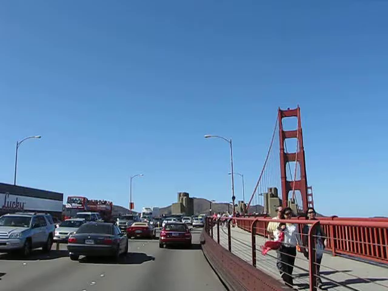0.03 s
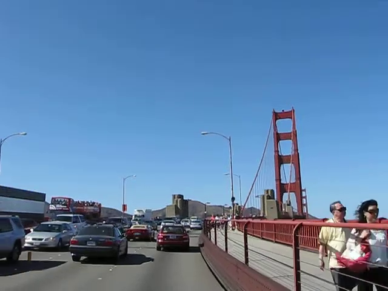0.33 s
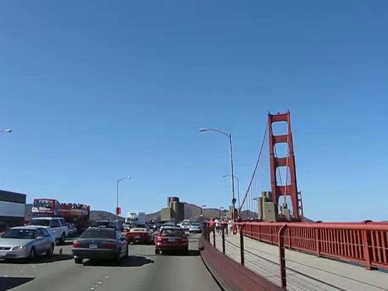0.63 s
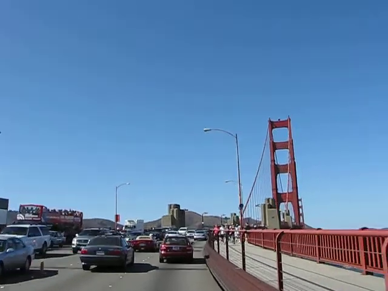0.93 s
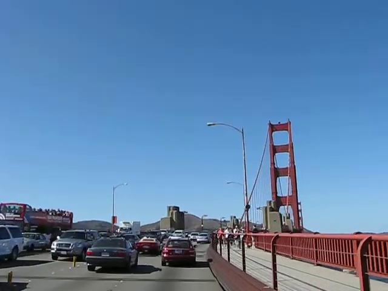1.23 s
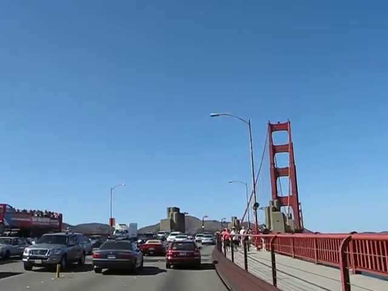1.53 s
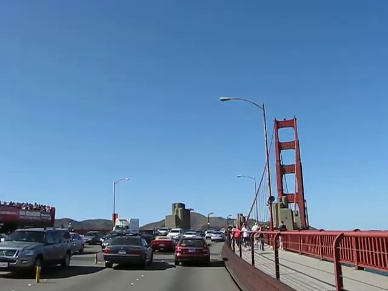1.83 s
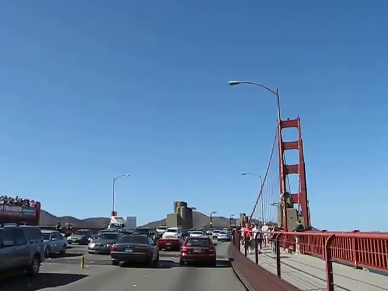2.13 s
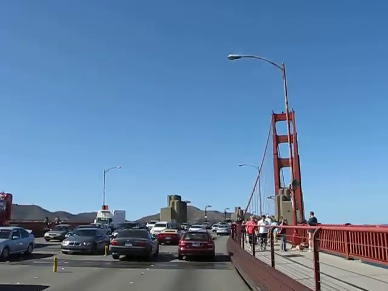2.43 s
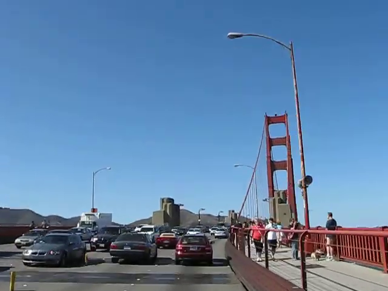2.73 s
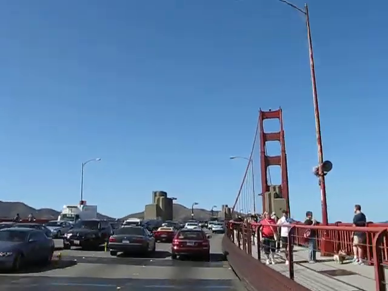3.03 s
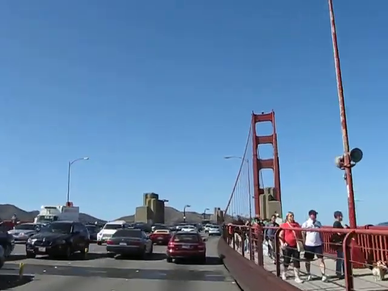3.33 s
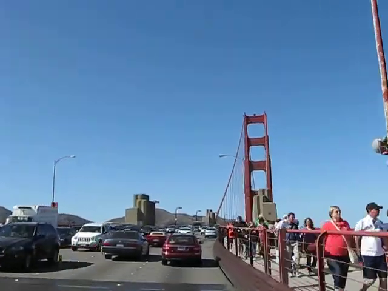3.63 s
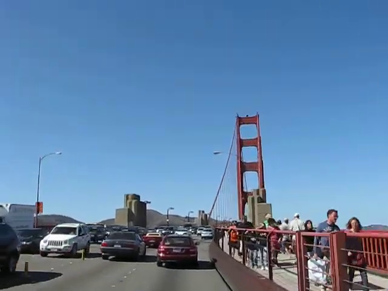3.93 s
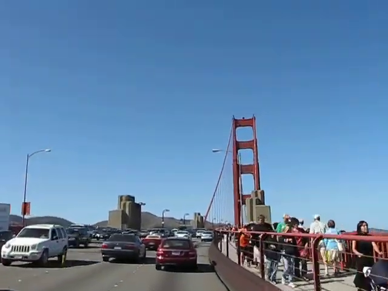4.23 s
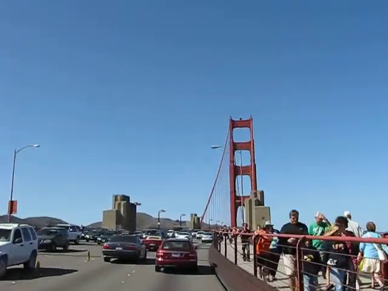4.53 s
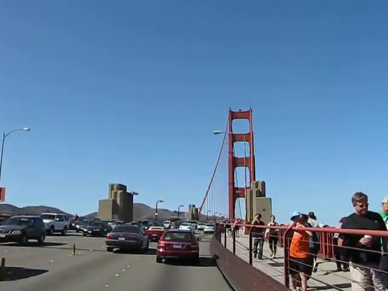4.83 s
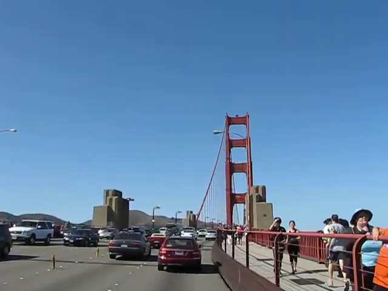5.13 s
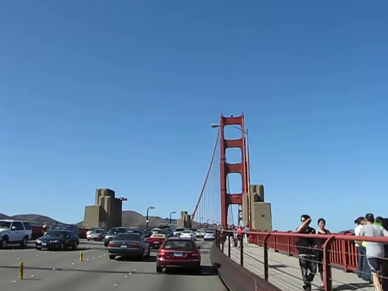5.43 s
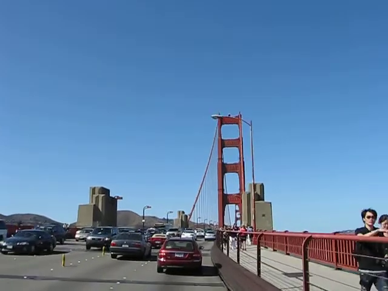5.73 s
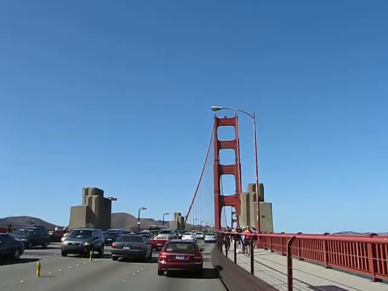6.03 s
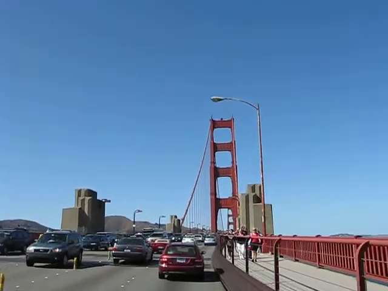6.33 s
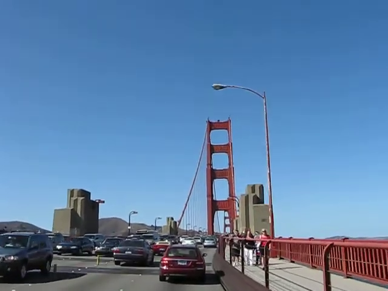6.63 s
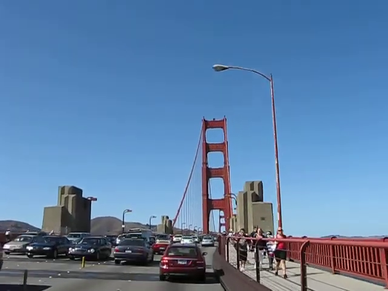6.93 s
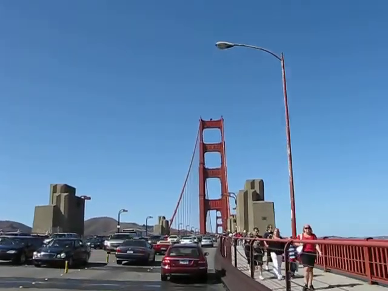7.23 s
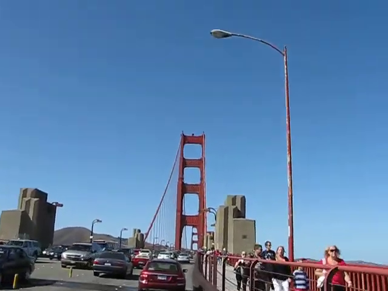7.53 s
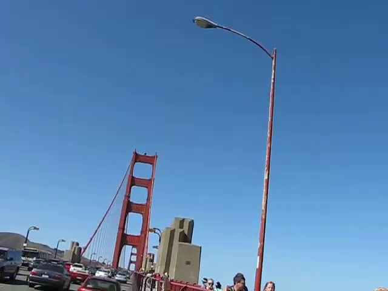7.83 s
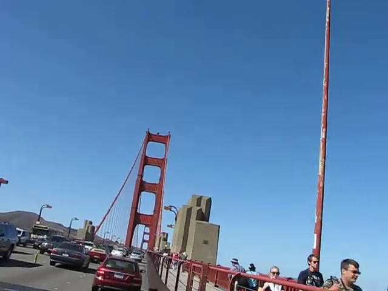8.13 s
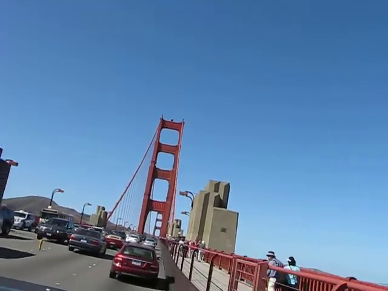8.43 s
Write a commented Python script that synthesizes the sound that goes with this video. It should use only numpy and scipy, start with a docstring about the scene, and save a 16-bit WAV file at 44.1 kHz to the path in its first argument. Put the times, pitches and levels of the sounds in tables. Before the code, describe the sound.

Gusty wind rumbles and thumps on the microphone of a moving vehicle, over an even rush of road traffic.

```python
"""Wind on a microphone in traffic

Wind batters the two microphone ports of a camera on an open vehicle crossing a bridge. Big eddies
rumble and thump, small ones tear and hiss as the gusts rise, and the strongest overload the capsules.
Underneath, the road rushes evenly; a brake squeals faintly on the left, and one dry tick follows."""
import sys
import numpy as np
from scipy import signal
from scipy.fft import rfft, irfft, next_fast_len
from scipy.io import wavfile
from scipy.ndimage import uniform_filter1d

SR = 44100
rng = np.random.default_rng(int(sys.argv[2]) if len(sys.argv) > 2 else 0)


def persist_wave(psi):
    """Save psi, clipped to +-1, as 16-bit WAV."""
    counts = np.round(np.clip(psi, -1, 1) * 32767).astype(np.int16)
    wavfile.write(sys.argv[1], SR, np.atleast_2d(counts).T)


N = 377937
TIME = np.arange(N) / SR
# Each row: the share of a left-minus-right level difference that one port takes, left first.
SIDES = np.array([[.5], [-.5]])


def undb(db):
    """Amplitude grows tenfold for every 20 dB."""
    return 10 ** (np.asarray(db) / 20)


def curves(table):
    """Linear interpolation turns each column after the first into a curve in time."""
    times, *columns = np.transpose(table)
    return [np.interp(TIME, times, column) for column in columns]


def swell(centre_s, half_s):
    """A Gaussian pulse peaks at 1 and falls to 1/e at half_s to either side."""
    return np.exp(-np.minimum(((TIME - centre_s) / half_s) ** 2, 20))


def noise(colour):
    """Spectral shaping colours white noise, independently for each port; rms 1."""
    size = next_fast_len(N)
    hz, db = np.transpose(colour)
    bin_hz = np.maximum(np.arange(size // 2 + 1) * SR / size, 1)
    gain = undb(np.interp(np.log(bin_hz), np.log(hz), db))
    x = irfft(rfft(rng.standard_normal((2, size))) * gain, size)[:, :N]
    return x / x.std()


def walk(per_s):
    """Random steps, smoothed twice, give each port a fluctuation of standard deviation 1."""
    hold = max(int(SR / per_s), 2)
    levels = rng.standard_normal((N // 2 + 1, 2))[:N // hold + 1].T
    steps = np.repeat(levels, hold, axis=1)
    x = uniform_filter1d(uniform_filter1d(steps, hold), hold)[:, :N]
    return x / x.std()


def one_pole(x, hz, kind):
    """A first-order filter slopes by 6 dB an octave beyond its corner."""
    return signal.sosfilt(signal.butter(1, hz, kind, fs=SR, output="sos"), x)


def lee():
    """Wind shadow: the windward port gets more of the flow, the sheltered one less."""
    # Each row: time in seconds, left minus right in dB before each source scales it.
    wind_side = [(0.12, -3.5), (0.22, 1.5), (0.3, -6.5), (0.84, -4.5), (0.98, -8), (1.08, -4), (1.66, -7.5),
                 (1.74, 2.5), (1.84, -5.5), (2.6, -6.0), (2.72, -4.5), (4.04, -5), (4.16, -1.0),
                 (4.36, -5.5), (6.08, -3), (6.32, 1.5), (6.54, -6.5), (8.04, -5.5), (8.12, -3.5),
                 (8.54, -6)]
    pan_db, = curves(wind_side)
    return pan_db * SIDES


def airflow(spread=1.19, sway_db=1.07, flutter_db=1.43, burst_db=2.5):
    """Turbulence varies the flow on many time scales; the result is in dB about its mean at each port."""
    # Each row: time in seconds, strength of the wind in dB.
    gusts = [(0.11, -27.5), (0.19, -35), (0.23, -34), (0.3, -25.5), (0.36, -32.5), (0.83, -28.5),
             (1.02, -42), (1.23, -30.5), (1.58, -29.5), (1.7, -33.5), (1.94, -24), (1.99, -28.5),
             (2.57, -28.0), (2.6, -33.5), (2.72, -34), (2.76, -27), (2.84, -23.5), (2.94, -30.5),
             (2.99, -23.5), (3.04, -28), (3.22, -26), (3.3, -31), (3.9, -30.5), (3.97, -24), (4.27, -31.5),
             (4.45, -27.5), (4.68, -35), (4.72, -38), (5.08, -28.5), (5.37, -37.5), (5.45, -31),
             (5.52, -36.5), (5.62, -30), (5.69, -38), (5.74, -34.5), (6.08, -32.5), (6.16, -26.5),
             (6.21, -29), (6.56, -29.0), (6.71, -32.5), (6.79, -26.5), (6.89, -33), (6.93, -28),
             (7.17, -39), (7.35, -31), (7.4, -37.0), (7.52, -32), (7.71, -33), (7.82, -26.5), (7.95, -32),
             (8.05, -30), (8.13, -23.0), (8.28, -25), (8.32, -33.5), (8.44, -23.5), (8.54, -26.5)]
    gust_db, = curves(gusts)
    flow_db = gust_db - gust_db.mean() + spread * lee() + gust_fronts()
    return flow_db + sway_db * walk(25) + flutter_db * walk(70) + burst_db * walk(400)


def buffeting(deep_db=-14.5, roar_db=-14.0, deep_swing=1.34, roar_swing=1.3,
              deep_spread=0.88, roar_spread=1.1, throb_db=1.97, shared=0.38):
    """Vortex shedding: the vehicle's big eddies push on each diaphragm; only the deepest span both."""
    # Each row: time in seconds, rumble and roar contours in dB before the swings scale them.
    contours = [(0.12, -14.0, -6.5), (0.2, -16.5, -14.5), (0.34, -21.5, -10.5), (0.86, -15, -14.5),
                (1.02, -20, -17.5), (1.12, -20, -12), (2.04, -12.5, -13.5), (2.34, -18.5, -13.5),
                (3.32, -13, -13), (3.64, -16.5, -15.5), (3.72, -20, -15), (4.12, -16.5, -11.5),
                (4.92, -24, -14.5), (5.02, -18, -14.5), (5.32, -20.5, -16), (5.44, -17, -16.0),
                (6.06, -17.5, -15.5), (6.18, -15.5, -13.5), (7.0, -18.5, -12.5), (7.14, -21.5, -14.5),
                (7.28, -19, -18), (8.0, -24.5, -10), (8.1, -12.5, -11.5), (8.54, -17.0, -12)]
    # The heaviest eddies. Each row: time in seconds, rise in dB, left minus right in dB.
    thumps = [(.1, 5.5, -10), (.47, 4, 5), (2.07, 0.5, -8), (2.87, 2.5, -12), (3.25, 3.5, -5), (3.33, 7, 5),
              (3.48, -2, 12), (4.5, 9, -8), (6.13, -1, -7), (6.53, 9, -8), (6.94, 1.5, 5), (8.07, -7, 6)]
    # Each row: frequency in Hz, relative spectral density in dB.
    colour = [(12, -3), (28, -3.5), (60, 1), (120, -2), (220, -4), (350, -12), (600, -26), (1200, -51),
              (4000, -76)]
    deep_contour, roar_contour = (db - db.mean() for db in curves(contours))
    thump_db = sum((db + pan_db * SIDES) * swell(s, half_s=0.03) for s, db, pan_db in thumps)
    pressure = noise(colour)
    pressure = pressure + shared * one_pole(pressure[::-1], 30, "low")
    deep = one_pole(pressure, 150, "low")
    rumble = deep * undb(deep_db + deep_swing * deep_contour + thump_db + deep_spread * lee())
    roar = (pressure - deep) * undb(roar_db + roar_swing * roar_contour + roar_spread * lee())
    return (rumble + roar) * undb(throb_db * walk(22))


def eddies(flow_db, level_db=-16, growth=0.95, brightening=0.18):
    """Edge noise: small eddies break on the ports, and faster air makes them smaller and brighter."""
    # Each row: frequency in Hz, relative spectral density in dB.
    colour = [(60, -6), (180, 1), (320, 1.5), (500, -1.5), (750, -7), (1100, -14), (1600, -21.5),
              (2600, -26), (4500, -38), (7000, -58), (16000, -83)]
    pressure = noise(colour) * undb(level_db + growth * flow_db)
    dull = one_pole(pressure, 900, "low")
    return dull + (pressure - dull) * undb(brightening * flow_db)


def road(level_db=-33, swell_db=0.48):
    """Many tyres and engines add incoherently into an even rush that swells slowly."""
    # Each row: frequency in Hz, relative spectral density in dB.
    colour = [(30, -6), (120, -3.5), (500, -1), (1000, -18), (2500, -23.5), (5000, -49), (9000, -54),
              (16000, -56)]
    return noise(colour) * undb(level_db + swell_db * walk(0.98))


def overload(pressure, ceiling=.46, knee=9):
    """Saturation: the capsules flatten big swings, and the corners of the flat tops add a rasp."""
    return pressure / (1 + np.abs(pressure / ceiling) ** knee) ** (1 / knee)


def hiss(flow_db, level_db=-41.5, growth=1.37, spit_db=3.5, pan_db=2.0, tear_side=-0.44):
    """Fine turbulence spits across the camera body and flares as it tears on an edge, more on the right."""
    # Each row: time in seconds, half length in seconds, extra hiss in dB averaged over the ports.
    tears = [(.11, 0.027, 6.5), (2.08, 0.057, 6), (2.213, 0.025, 8), (2.454, 0.064, 3), (2.86, .03, -0.5),
             (2.989, 0.023, 7), (3.16, .06, 3.5), (4.1, 0.052, 6), (5.614, 0.011, 5.5), (5.813, 0.016, 8),
             (6.174, 0.03, 5), (7.34, 0.014, 8), (8.152, .05, 1.5)]
    # Each row: frequency in Hz, relative spectral density in dB.
    colour = [(500, 9), (1500, -6), (2800, -3.5), (4600, -6.5), (7000, -14.5), (10000, -23), (16000, -36)]
    tear_db = sum(db * swell(s, half_s) for s, half_s, db in tears) * (1 + tear_side * SIDES)
    hiss_db = level_db + pan_db * SIDES + growth * flow_db + tear_db
    return noise(colour) * undb(hiss_db + spit_db * walk(1100))


def crackle(flow_db, per_s=40, level_db=-23.0, growth=0.76, pan_db=-2, scatter_db=7):
    """Shot noise: lone tiny vortices snap at the port edges at random, even between gusts."""
    hits = rng.random((2, N)) < per_s / SR
    size = undb(scatter_db * np.clip(rng.standard_normal((2, N)), -2, 2))
    polarity = np.sign(rng.standard_normal((2, N)))
    snaps = one_pole(one_pole(hits * size * polarity, 2200, "low"), 1500, "high")
    return snaps * undb(level_db + pan_db * SIDES + growth * flow_db)


def gust_fronts(decay_s=0.0049, lull_s=0.012, lull_depth=0.84):
    """Flow transients: the air lets go for an instant, then a front strikes and decays; in dB per port."""
    # Each row: time in seconds, change of flow in dB, left minus right in dB, both before smoothing.
    fronts = [(.726, -4, 19), (1.105, 3, -5), (1.383, 0, -3), (2.749, 5.5, 6), (2.827, 3, -5),
              (3.088, -7, 3), (3.46, 9.5, -3), (3.532, 3, 6), (3.68, 8, 2), (3.759, 9, -2),
              (4.135, 7.5, 24), (5.009, 10, 6), (5.72, 13, 1), (6.394, 2, -12), (6.542, 2, 7),
              (6.655, 8.5, -9), (7.214, 8, 6), (7.49, 8.5, -15), (7.772, 6, 1), (8.323, 12, 0)]
    change_db = np.zeros((2, N))
    for s, db, pan_db in fronts:
        near = np.abs(TIME - s) < .08
        t = TIME[near] - s
        shape = np.where(t >= 0, np.exp(-t / decay_s), -lull_depth * np.exp(t / lull_s))
        change_db[:, near] += (db + pan_db * SIDES) * shape
    return uniform_filter1d(change_db, size=90)  # a front crosses a port in about 2 ms


def brake(start_s=4.25, attack_s=.55, hold_s=.14, release_s=.24, start_hz=4900, sag_hz_per_s=220,
          level_db=-57.0, octave_db=-18, pan_db=9, waver=0.00336, chatter_db=5.5):
    """Friction makes a brake disc sing a thin, wavering note that sinks as the wheel slows."""
    t = TIME - start_s
    envelope = np.interp(t, np.cumsum([0, attack_s, hold_s, release_s]), [0, 1, 1, 0])
    hz = (start_hz - sag_hz_per_s * t) * (1 + waver * walk(200)[0])
    phase = 2 * np.pi * np.cumsum(hz) / SR
    octave = envelope ** 4 * undb(octave_db) * np.sin(2 * phase)  # shows only near the peak
    return envelope * (np.sin(phase) + octave) * undb(level_db + pan_db * SIDES + chatter_db * walk(80))


def tick(start_s=5.4231, decay_s=0.00035, left=.17, right=0.52):
    """A pressure step with fast exponential relaxation is heard as one dry tick."""
    pulse = (TIME >= start_s) * np.exp(-np.abs(TIME - start_s) / decay_s)
    return np.array([[left], [right]]) * pulse


def scene():
    """Superposition: buffeting, eddies and road saturate together, and the finer sounds add on top."""
    flow_db = airflow()
    capsules = overload(buffeting() + eddies(flow_db) + road())
    return capsules + hiss(flow_db) + crackle(flow_db) + brake() + tick()


def record(dry, start_s=.072, rise_s=.00002, surge=1.2, settle_s=0.006, top_hz=15800):
    """Band limiting tilts the flat tops and cuts the top treble; the sound starts loud, then settles."""
    since = np.maximum(TIME - start_s, 0)
    opening = (1 - np.exp(-since / rise_s)) * (1 + surge * np.exp(-since / settle_s))
    clipped = np.clip(one_pole(dry, 6.3, "high") * opening, -1, 1)
    return signal.sosfilt(signal.ellip(10, .2, 70, top_hz, fs=SR, output="sos"), clipped)


dry = scene()
out = record(dry)
persist_wave(out)
```